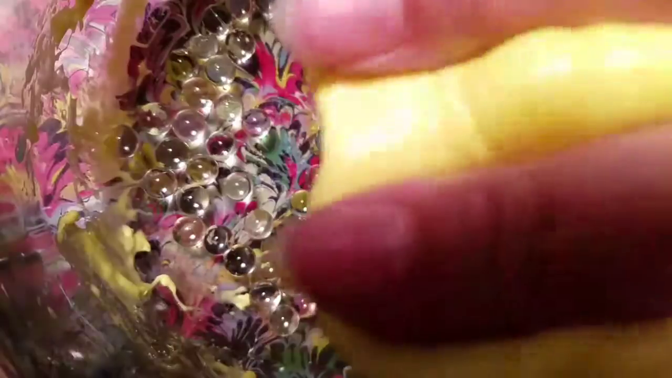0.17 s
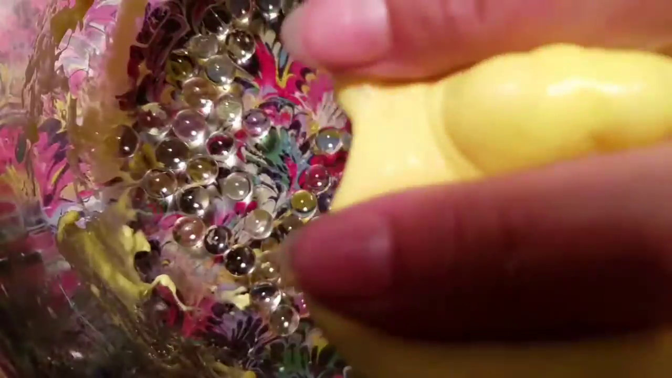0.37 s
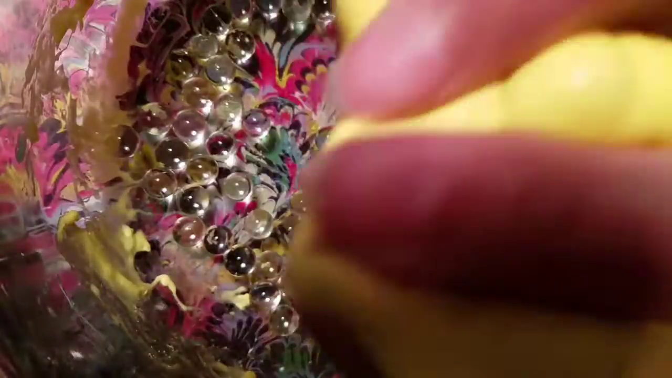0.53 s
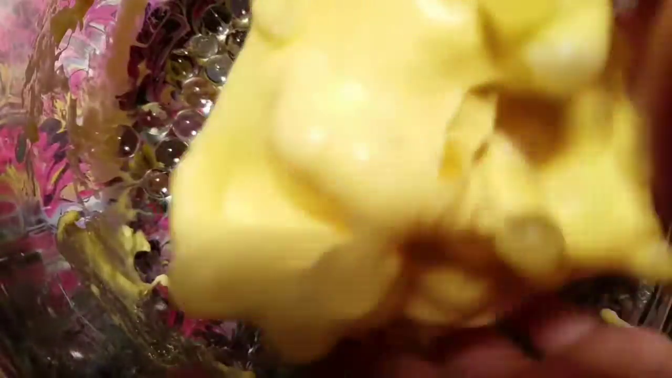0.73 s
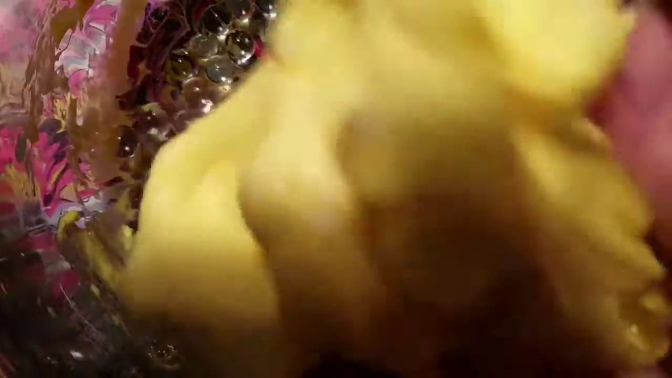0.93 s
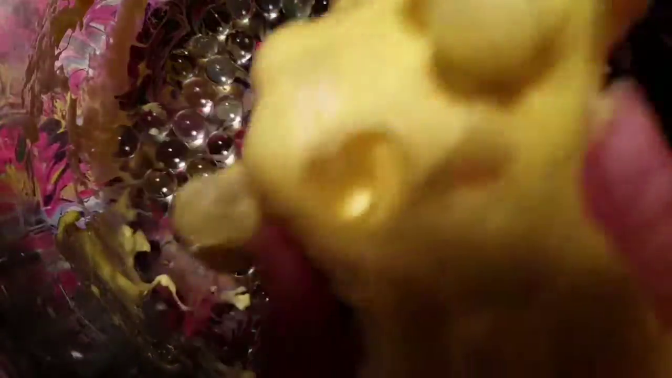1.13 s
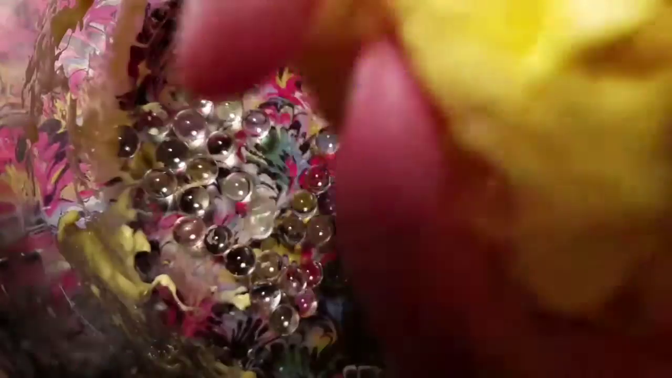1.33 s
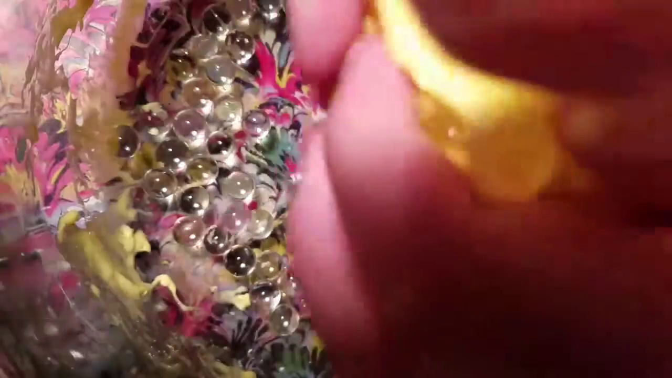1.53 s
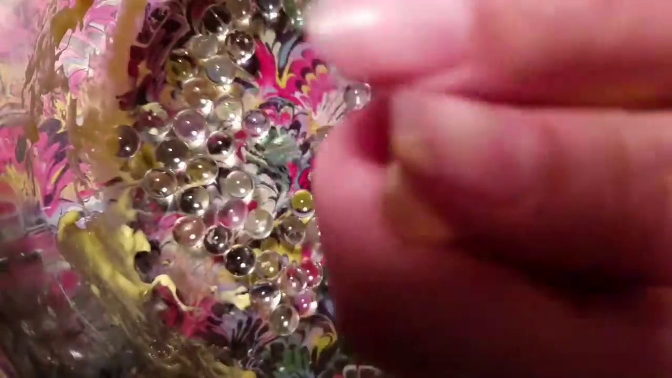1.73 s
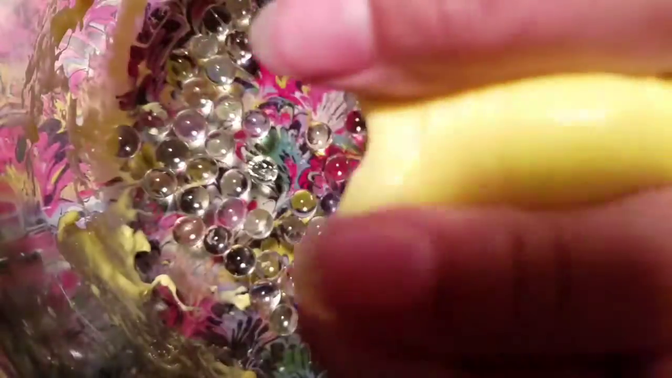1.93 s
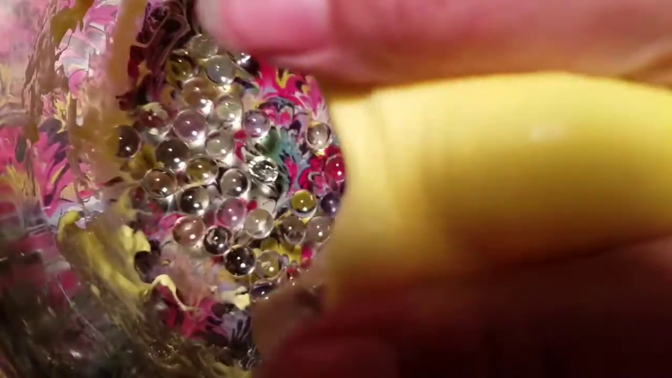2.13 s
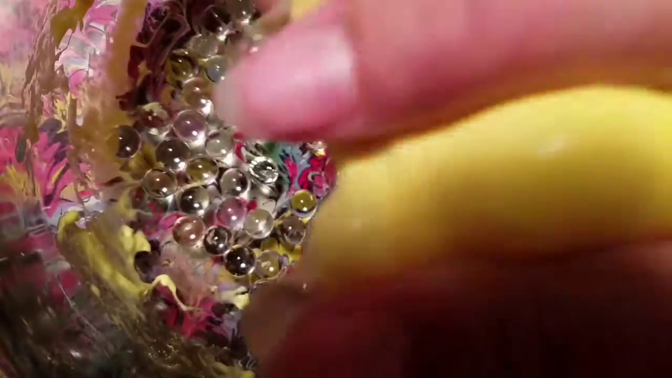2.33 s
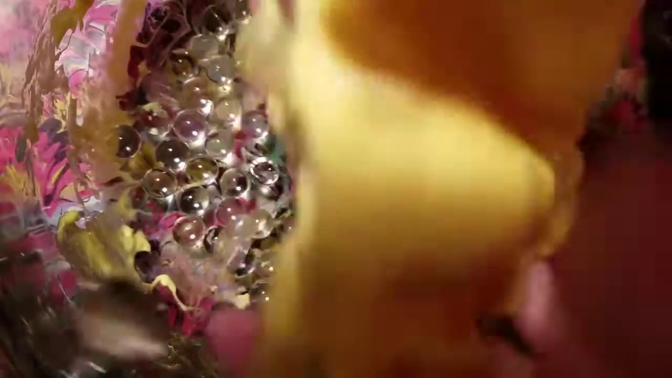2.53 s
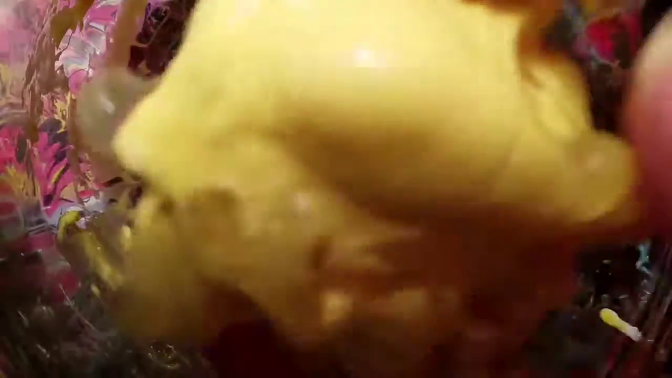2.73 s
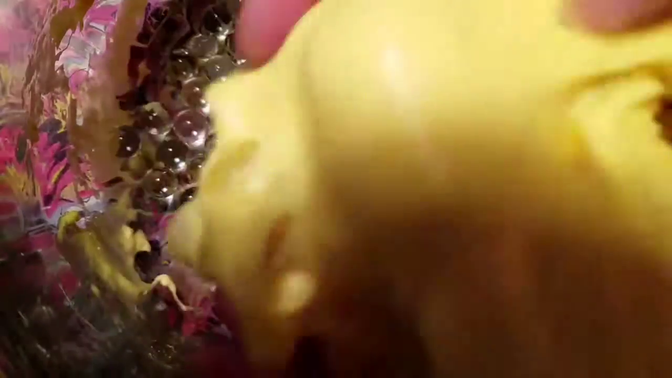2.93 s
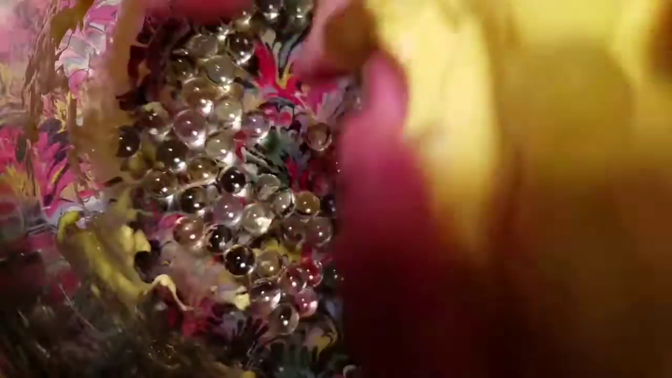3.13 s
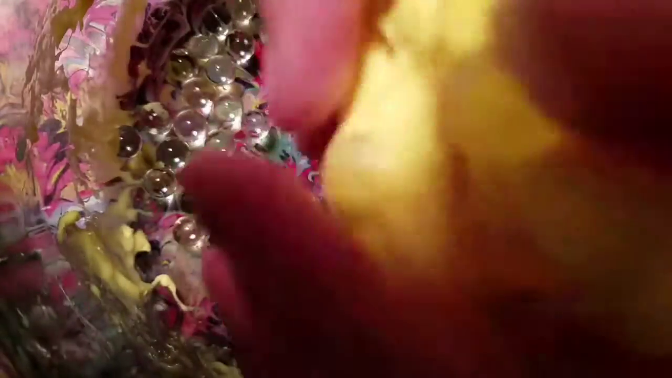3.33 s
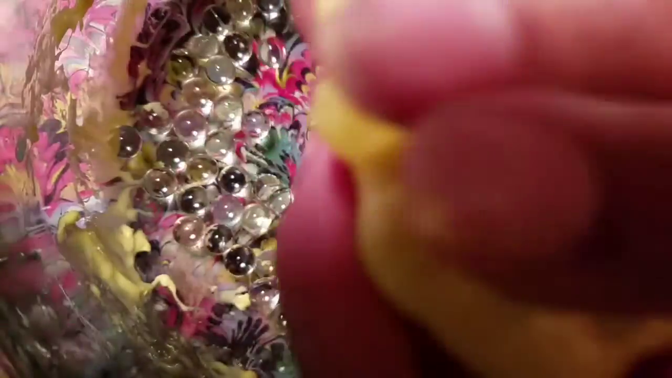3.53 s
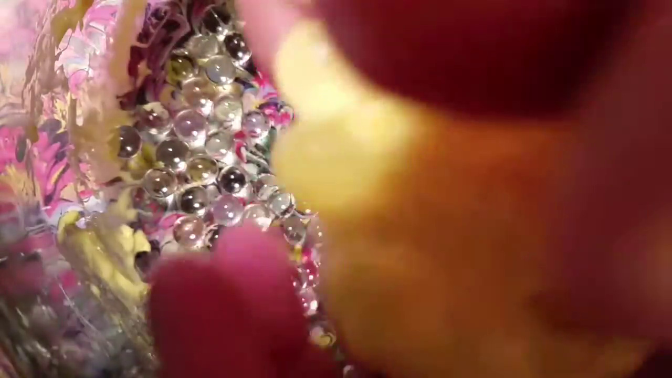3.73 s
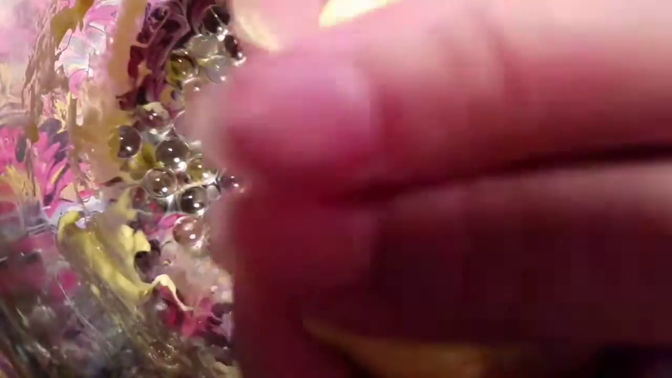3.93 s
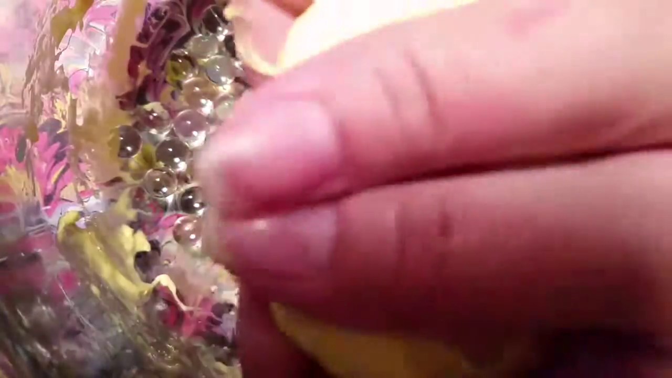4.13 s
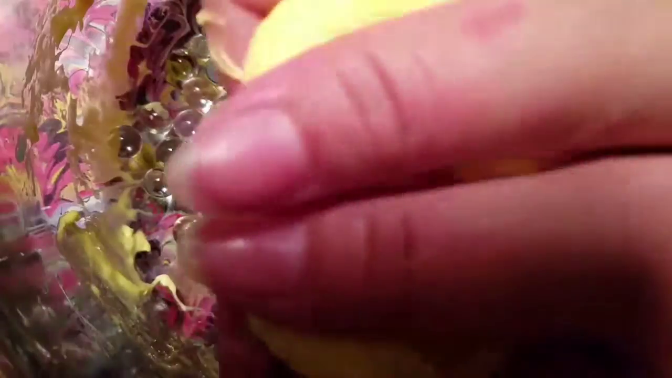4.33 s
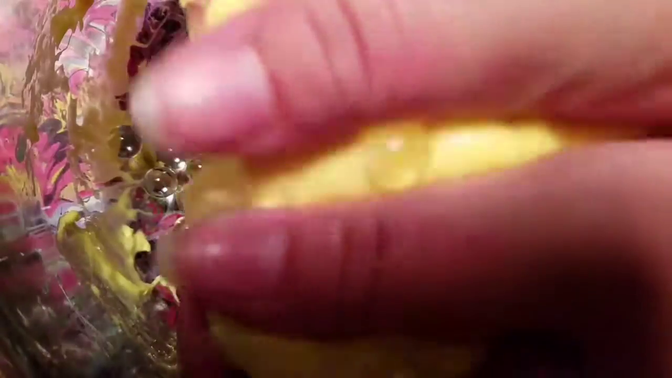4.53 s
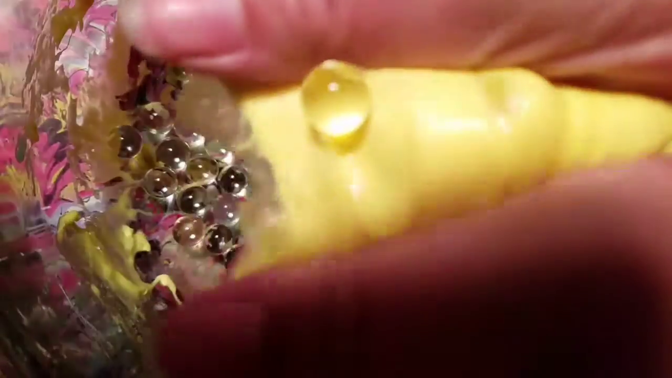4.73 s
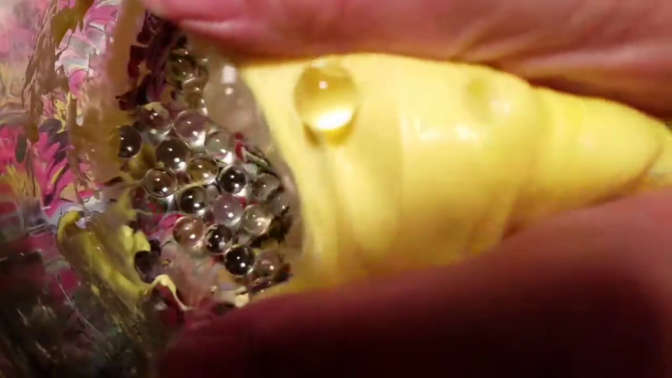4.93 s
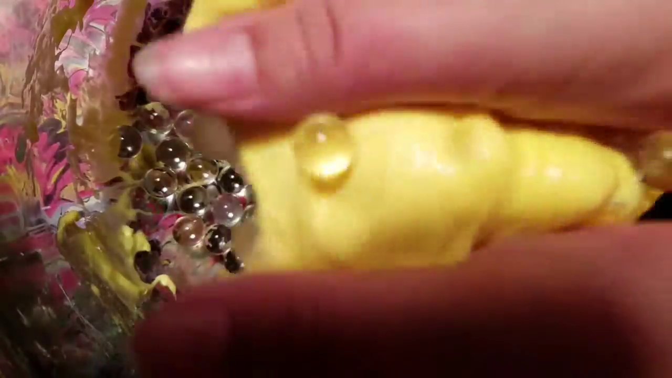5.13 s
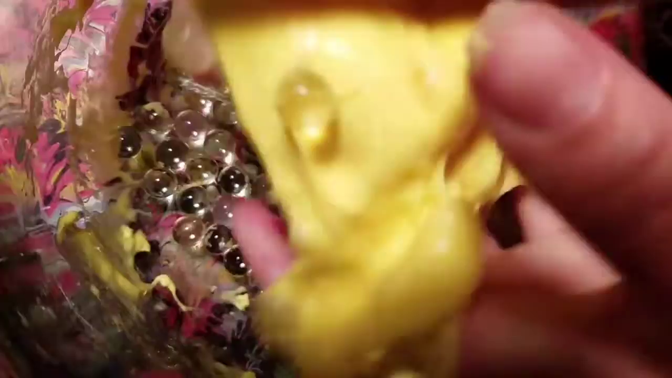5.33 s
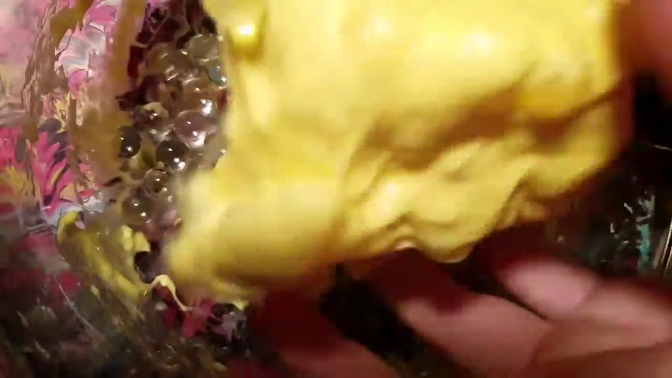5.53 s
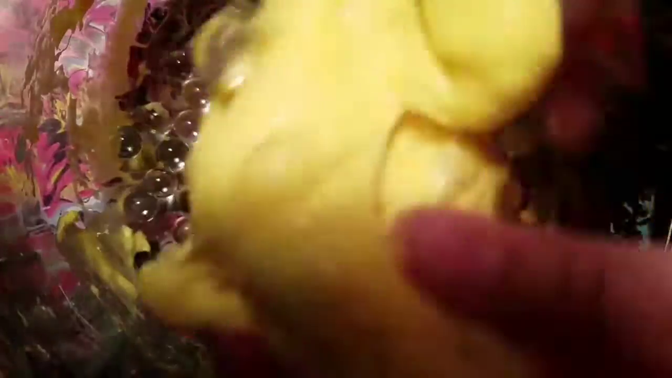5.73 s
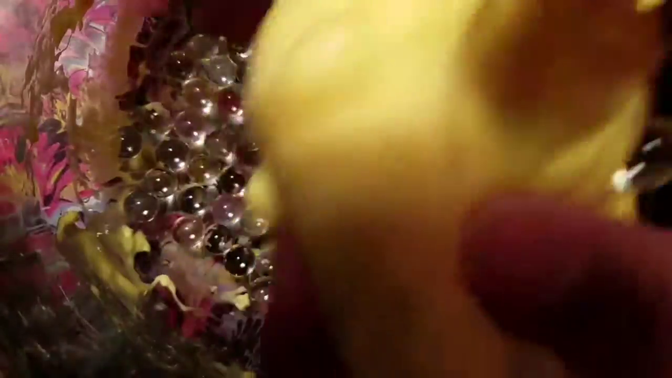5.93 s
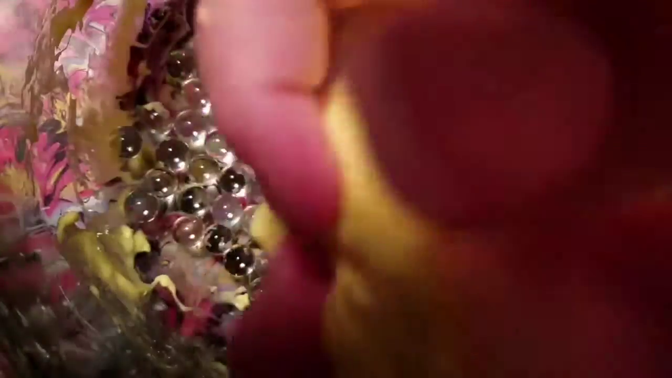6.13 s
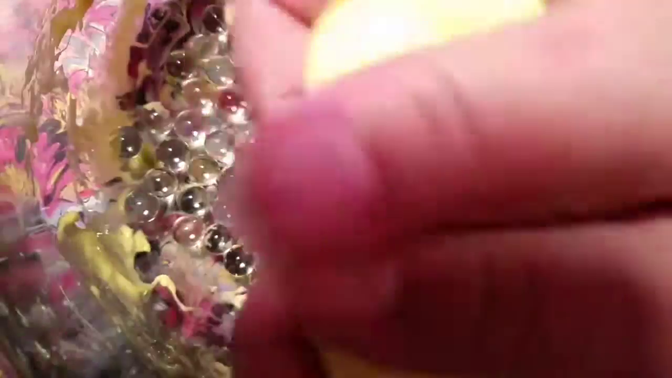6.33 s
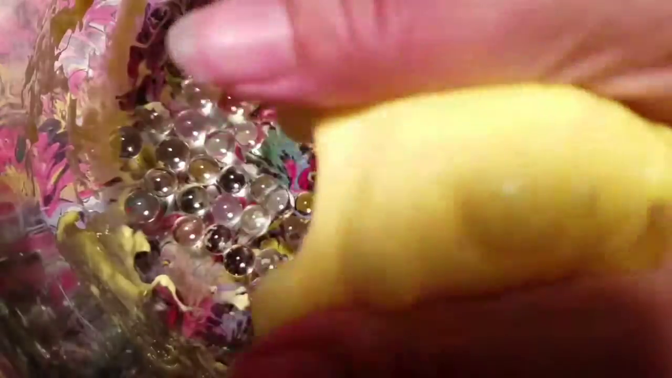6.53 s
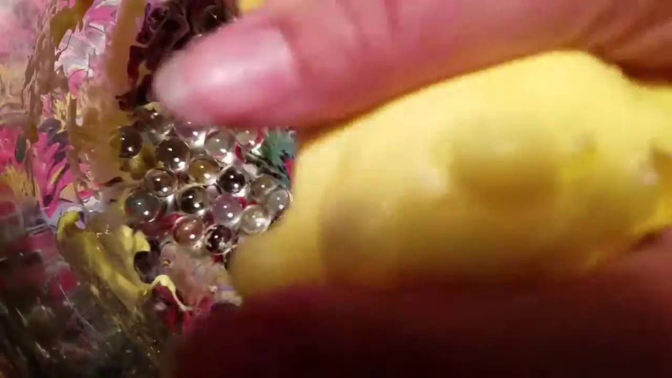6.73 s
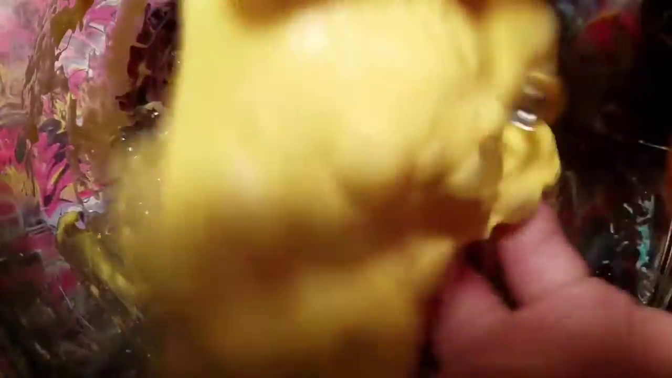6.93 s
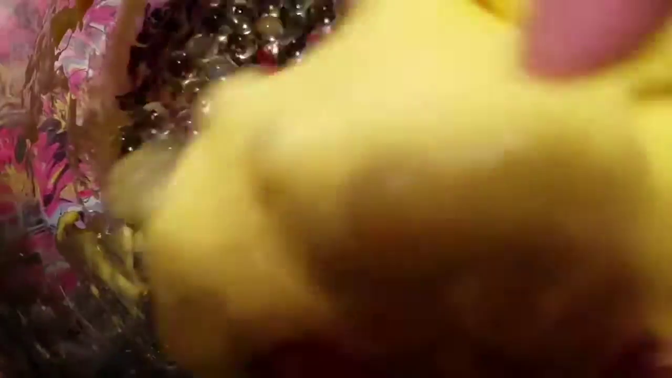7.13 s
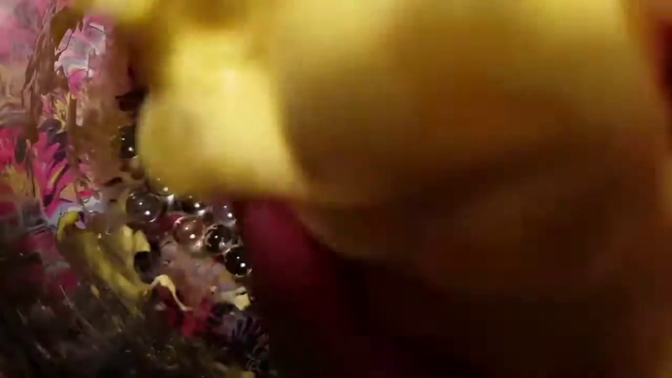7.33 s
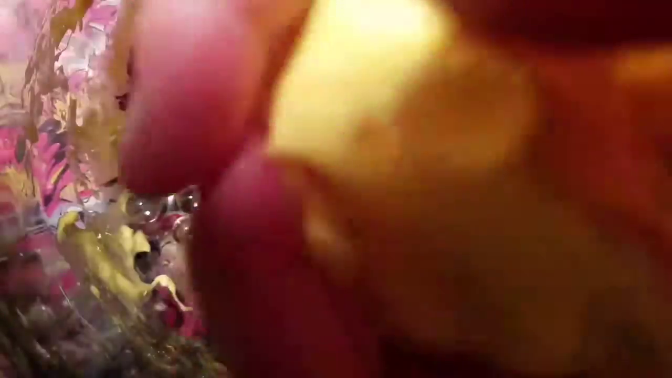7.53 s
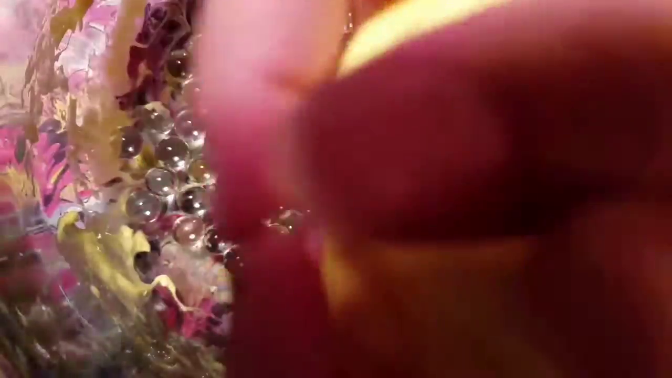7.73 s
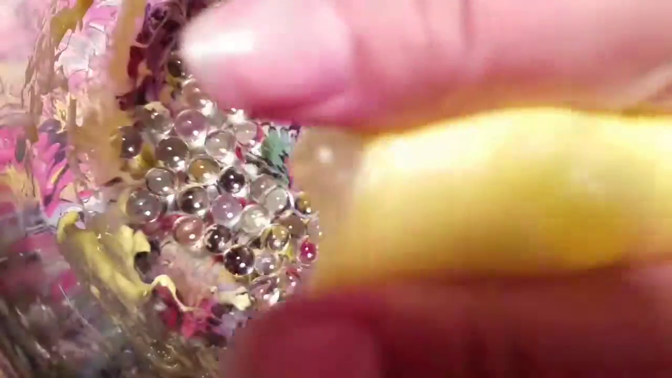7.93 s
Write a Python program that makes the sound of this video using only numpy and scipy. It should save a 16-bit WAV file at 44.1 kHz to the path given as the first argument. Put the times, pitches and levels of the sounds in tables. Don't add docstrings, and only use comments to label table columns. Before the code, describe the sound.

Very close stereo pickup of hands kneading sticky, beaded slime in a glazed bowl. Dense wet pops and crackles burst out at once, thin to sparse peeling and ticks, then return in further squeezes. Dull palm thuds and faint ringing touches on the bowl come later. The small indoor room is quiet, with a low faint hum.

```python
import sys
import numpy as np
from scipy import signal
from scipy.fft import rfft, irfft, next_fast_len
from scipy.io import wavfile
from scipy.ndimage import uniform_filter1d

SR = 44100
rng = np.random.default_rng(int(sys.argv[2]) if len(sys.argv) > 2 else 0)


def field_ratio(decibels):
    return 10 ** (np.asarray(decibels, dtype=float) / 20)


def generate_wav(sig):
    pcm = np.round(np.clip(np.atleast_2d(sig).T, -1, 1) * 32767).astype(np.int16)
    wavfile.write(sys.argv[1], SR, pcm)


N = 356328

# pitch in Hz, width in Hz, level in dB.
HOLLOW = [(667.5, 60.4, 9), (365, 330, -9.5)]
# pitch in Hz, width in Hz, level in dB.
BOWL_AIR = [(1454, 210, 12.5), (1590, 41, -15), (1850, 2500, 1)]
# pitch in Hz, width in Hz, level in dB.
UPPER_AIR = [(2263, 160, 15.5), (2753, 220, 13.5), (3140, 250, 8.5), (3790, 200, 9), (4410, 200, 4)]
# pitch in Hz, width in Hz, level in dB.
CRACK = [(5380, 3900, -2), (7360, 890, 1.5), (7910, 1040, 1), (11040, 810, 2.5), (13250, 1330, 4),
         (14470, 1200, -2)]


def rms_one(x):
    return x / np.sqrt(np.mean(x ** 2) + 1e-20)


def poles(hz, width_hz):
    r = np.exp(-np.pi * width_hz / SR)
    return np.array([1, -2 * r * np.cos(2 * np.pi * hz / SR), r * r])


def resonate(x, modes, extra_db):
    out = 0
    for k, (hz, width_hz, db) in enumerate(modes):
        a = poles(hz, width_hz)
        b = [(1 - a[2]) / 2, 0, (a[2] - 1) / 2]
        out = out + (-1) ** k * signal.lfilter(b, a, field_ratio(db + extra_db[k]) * x)
    return out


def add(track, s, sound):
    i = round(s * SR)
    track[..., i:i + sound.shape[-1]] += sound[..., :N - i]


def two_paths(x, other, lag, alike):
    alike = np.clip(alike, 0, 1)
    right = alike * x + np.sqrt(1 - alike ** 2) * other
    return np.array([x, np.roll(right, lag)])


def room_tone():
    # frequency in Hz, level in dB per Hz.
    tone_points = np.array([(26, -19), (45, -4), (117, -7.5), (200, -10), (377, 1), (646, -15),
                            (786, -11.5), (2730, -21), (9510, -32), (13700, -24.5), (15500, -32)])
    # frequency in Hz, level in dB rms.
    mains_lines = [(120, -74.5)]
    size = next_fast_len(N)
    hz = np.maximum(np.arange(size // 2 + 1) * SR / size, 1)
    common, left, right = rfft(rng.standard_normal((3, size)))
    alike = .9 / (1 + (hz / 800) ** 4)
    both = np.sqrt(alike) * common + np.sqrt(1 - alike) * np.array([left, right])
    colour = field_ratio(np.interp(np.log(hz), np.log(tone_points[:, 0]), tone_points[:, 1]))
    hiss = field_ratio(-60.5) * rms_one(irfft(both * colour, size)[:, :N])
    t = np.arange(N) / SR
    hum = sum(np.sqrt(2) * field_ratio(db) * np.sin(2 * np.pi * line_hz * t) for line_hz, db in mains_lines)
    return hiss + hum


def port_noise():
    band = signal.butter(2, [45, 170], "band", fs=SR, output="sos")
    low = signal.sosfilt(band, rng.standard_normal((2, N)))
    smack_db = uniform_filter1d(peeling()[0], size=8000)
    port_db = np.array([-70.0, -71.5])[:, None]
    return field_ratio(port_db + 0.45 * (smack_db + 62)) * rms_one(low)


def motor_buzz():
    partials_db = [-56, -60]
    start, end, buzz_hz = 2.05, 2.25, 187.4
    out, t = np.zeros((2, N)), np.arange(SR) / SR
    on = np.clip(np.minimum(t, end - start - t) / 0.017, 0, 1)
    buzz = sum(field_ratio(db) * np.sin(2 * np.pi * (k + 1) * buzz_hz * t) for k, db in enumerate(partials_db))
    add(out[0], start, on * buzz)
    return out


def wall_pings():
    # start in seconds, then the level of each wall mode in dB.
    touches = [
        (5.26, -52.5, -90, -90, -90),
        (5.42, -52, -59.5, -67.5, -90),
        (6.988, -56, -46, -58, -66),
    ]
    # time to fall 60 dB in seconds, right port against left in dB.
    wall_modes = [(2.1, -53), (0.75, -7.5), (0.44, 11.5), (0.3, 9)]
    wall_hz = [684, 1588, 2815, 6200]
    out, t = np.zeros((2, N)), np.arange(SR) / SR
    for s, *levels_db in touches:
        for hz, db, (t60_s, right_db) in zip(wall_hz, levels_db, wall_modes):
            beat = 1 + 0.15 * np.cos(2 * np.pi * hz / 167.0 * t)
            ring = field_ratio(db - 60 * t / t60_s) * np.sin(2 * np.pi * hz * t) * beat
            add(out, s, ring * [[1], [field_ratio(right_db)]])
    return out


def thuds():
    # start in seconds, peak in dB, pitch in Hz.
    bumps = [
        (4.137, -34.5, 290),
        (5.236, -37.5, 330),
        (5.455, -45, 346),
        (6.929, -36.5, 330),
        (7.106, -36, 400),
        (7.117, -39, 232),
        (7.138, -44, 300),
        (0.62, -43, 222),
    ]
    t60_s, sag, sag_s = 0.035, 0.41, 0.0097
    out, t = np.zeros(N), np.arange(SR // 4) / SR
    sagging = t * (1 - sag) + sag * sag_s * (1 - np.exp(-t / sag_s))
    rise = np.minimum(t / 0.00095, 1)
    for s, db, hz in bumps:
        add(out, s, field_ratio(db - 60 * t / t60_s) * np.sin(2 * np.pi * hz * sagging) * rise)
    return out


def ticks():
    # start in seconds, peak in dB, pitch in Hz.
    bubbles = [(0.16, -31, 2340), (0.441, -52, 2000), (0.811, -54, 2450), (0.944, -51.5, 2840),
               (1.11, -57, 3670), (1.213, -58, 7440), (1.378, -59, 2490), (1.448, -49.5, 2080),
               (2.2539, -40, 2270), (2.312, -58, 5000), (2.603, -45, 1310), (3.466, -54, 2330),
               (3.6421, -53.5, 1350), (3.762, -52, 2640), (3.7883, -53.5, 2840), (3.836, -54, 2740),
               (3.9609, -49.5, 1310), (4.1368, -22, 6600), (4.136, -25, 1990), (4.1387, -30, 4400),
               (4.3425, -53, 6740), (4.475, -65, 10000), (5.6116, -50, 2400), (6.017, -55, 7950),
               (6.035, -51, 8000), (6.4246, -41, 9300), (6.5074, -39, 10500), (6.633, -50, 9000),
               (7.5014, -45, 8000), (7.86, -55, 4940)]
    out, ms = np.zeros((2, N)), np.arange(2048) / SR * 1000
    for s, db, hz in bubbles:
        burst = rng.standard_normal((2, 2048)) * np.exp(-ms / .6) * (ms < 40)
        bubble = [(hz, .4 * hz, 0)]
        rung = resonate(two_paths(*burst, lag=9, alike=.85), bubble, [0])
        rung = resonate(rung, bubble, [0])
        add(out, s, field_ratio(db + 13.5) * rung / np.abs(rung).max())
    return out


def snaps():
    # start in seconds, level in dB, pitch in Hz.
    threads = [(0.014, -34, 4870), (0.029, -44, 8600), (0.0518, -37, 4500), (0.0614, -34, 3600),
               (0.0656, -32, 3200), (0.0727, -59, 6600), (0.179, -30, 3500), (0.2303, -29, 10300),
               (0.2509, -46, 3400), (0.3208, -35, 7000), (0.349, -35, 5800), (0.3654, -42, 7850),
               (0.3887, -43, 7500), (0.4748, -45.5, 6560), (0.5321, -50, 5500), (0.597, -35, 3830),
               (0.6123, -25, 2680), (0.6936, -43, 4000), (0.7695, -45, 12100), (0.7909, -46, 4400),
               (0.8774, -49, 3300), (0.9167, -48, 5800), (1.015, -33, 10500), (1.082, -52, 4700),
               (1.1872, -55, 11700), (1.3188, -53, 7400), (1.377, -52, 8600), (1.4137, -44, 8700),
               (1.465, -47, 5400), (1.7262, -53, 4400), (1.753, -42, 5600), (1.9492, -32, 3970),
               (1.9544, -43, 3800), (2.0896, -41, 5100), (2.1249, -44, 2700), (2.1323, -45, 3200),
               (2.1401, -51, 3100), (2.1495, -27, 3000), (2.1599, -29, 12200), (2.408, -35, 3200),
               (2.4256, -47, 8000), (2.4313, -32, 3500), (2.442, -46, 7400), (2.5659, -39, 4500),
               (2.5838, -53, 8100), (2.646, -42.5, 9200), (2.8754, -55, 4600), (3.0186, -36.5, 5700),
               (3.1297, -55, 7700), (3.2032, -44.5, 12200), (3.252, -46, 3300), (3.3295, -45, 10500),
               (3.5116, -54, 8800), (3.5587, -46, 9200), (3.6473, -41, 7500), (3.7037, -42, 12100),
               (3.767, -59, 8400), (4.5402, -57, 6000),
               (4.6077, -52, 10700), (4.7205, -35, 3400), (4.803, -37, 2800), (4.8191, -46, 3000),
                    (4.8249, -38, 11700), (4.8378, -10.5, 12700), (4.8556, -25, 11600), (4.8757, -32, 4800),
                    (4.947, -41, 8600), (4.9519, -50, 6700), (4.9649, -41, 7700), (5.014, -49, 3500),
                    (5.024, -33, 3230), (5.161, -43, 8000), (5.1944, -41, 5200), (5.221, -31, 3200),
                    (5.458, -45, 10800), (5.4657, -57, 3060), (5.6205, -49, 3500), (5.6825, -45, 5900),
                    (5.695, -45, 3200), (5.7332, -39, 4800), (5.9226, -53, 7200), (6.0263, -50, 13600),
                    (6.0914, -40.5, 5200), (6.3266, -39, 7400), (6.332, -49, 3100), (6.3726, -41, 9400),
                    (6.4089, -40, 3800), (6.4567, -43, 7300), (6.4728, -29, 13300), (6.5407, -24, 13600),
                    (6.5438, -28, 3840), (6.5489, -32, 3500), (6.5631, -39, 7000), (6.57, -34, 3100),
                    (6.575, -37, 3700), (6.6336, -35, 6200), (6.661, -30, 6600), (6.6934, -48, 6300),
                    (6.9348, -34, 5100), (6.991, -33.5, 4400), (7.041, -44, 3400), (7.1387, -40, 7200),
                    (7.2913, -35, 6100), (7.4914, -49, 9100), (7.5523, -41, 5200), (7.5784, -36, 4400),
                    (7.7615, -51, 3100), (7.7754, -38, 9400), (7.8074, -45, 10800), (7.8405, -46, 3700),
                    (7.9167, -41, 2530), (7.9736, -39, 3100), (7.9855, -28, 5800), (8.0209, -34, 7600),
                    (8.0252, -28, 5000), (8.0769, -31, 9100)]
    out, ms = np.zeros((2, N)), np.arange(512) / SR * 1000
    for s, db, hz in threads:
        burst = rng.standard_normal((2, 512)) * np.exp(-ms / 0.22)
        rung = resonate(two_paths(*burst, lag=12, alike=0.74), [(hz, 0.76 * hz, 0)], [0])
        add(out, s, field_ratio(db + 7.5) * rung / np.abs(rung).max())
    return out


def gurgles():
    # start in seconds, peak in dB, pitch in Hz.
    pockets = [(0.077, -18, 1590), (0.094, -16.5, 1500), (0.1077, -11, 1620), (0.1103, -20, 1310),
               (0.115, -6.5, 1546), (0.123, -17, 1610), (0.126, -16, 1550), (0.132, -30, 1480),
               (0.145, -19, 1540), (2.26, -27.5, 1095), (2.387, -33.5, 660), (4.1363, -18.5, 644.7)]
    fall_cycles, rise_cycles = 29, 1.54
    out, t = np.zeros(N), np.arange(SR // 8) / SR
    for s, db, hz in pockets:
        cycles = hz * t
        lift = 0.069 * (640 / hz) ** 2
        turns = cycles - lift * 2 * (1 - np.exp(-cycles / 2))
        swell = np.minimum(cycles / rise_cycles, 1)
        add(out, s, field_ratio(db - 60 * cycles / fall_cycles) * np.sin(2 * np.pi * turns) * swell)
    return two_paths(out, out, lag=5, alike=1)


def peeling():
    # crest in seconds, level in dB, length in seconds, dryness in dB.
    pressing = [(0.01, -51, 0.54, -17), (0.121, -37, 0.11, -20), (0.254, -54.5, 0.27, -12),
                (1.825, -54, 0.097, -8), (1.937, -51.5, 0.14, -17), (2.086, -53, 0.1, -16.5),
                (2.148, -44, 0.029, -37), (2.174, -48, 0.023, 8.5), (2.207, -47.5, 0.036, -7.5),
                (4.154, -55.5, 0.038, -2), (4.399, -69, 0.021, 7), (4.683, -54, 0.22, -15),
                (4.776, -47.5, 0.039, -13.5), (4.855, -49, 0.13, -10), (6.453, -54.5, 0.22, -16),
                (6.555, -46, 0.14, -16), (6.654, -37, 0.024, -18.5), (6.721, -51, 0.022, -2.5),
                (7.958, -51.5, 0.19, -17), (8.037, -52, 0.11, -11.5)]
    # crest in seconds, level in dB, length in seconds, dryness in dB.
    turning = [(0.606, -39, 0.12, -14.5), (0.81, -63, 0.37, -12.5), (1.04, -54, 0.077, -13),
               (1.321, -62, 0.085, -6), (1.473, -58.5, 0.068, -13.5), (2.423, -42.5, 0.096, -16),
               (2.509, -48.5, 0.12, -12), (2.815, -54.5, 0.087, -17), (2.985, -59.5, 0.11, -10),
               (3.267, -61.5, 0.12, -10.5), (3.645, -64, 0.1, -11.5), (3.76, -63.5, 0.099, -10.5),
               (5.934, -64, 0.024, -10), (6.232, -68.5, 0.24, -14), (5.218, -44, 0.12, -15),
               (5.299, -44.5, 0.048, -15), (5.43, -61.5, 0.23, -10), (5.728, -56, 0.16, -16.5),
               (5.8, -58, 0.071, -7), (6.047, -62, 0.092, -7.5), (6.111, -56.5, 0.1, -17),
               (6.854, -41.5, 0.15, -13.5), (7.073, -53, 0.11, -14.5), (7.264, -54, 0.13, -14),
               (7.487, -63, 0.23, -9), (7.576, -54, 0.066, -13.5)]
    rise_share, roundness, fade_db = 0.57, 1.405, 21.5
    resting_db = -78
    t = np.arange(0, N + 64, 64) / SR
    smack, fizz = field_ratio(2 * resting_db), field_ratio(2 * (resting_db - 9.5))
    for s, db, length_s, dry_db in pressing + turning:
        away = np.where(t < s, (s - t) / rise_share, t - s) / max(length_s, .01)
        power = field_ratio(2 * np.maximum(db - fade_db * away ** roundness, -200))
        smack = smack + power
        fizz = fizz + power * field_ratio(2 * dry_db)
    return [np.interp(np.arange(N) / SR, t, 10 * np.log10(p)) for p in (smack, fizz)]


def clumping():
    return rms_one(uniform_filter1d(rng.standard_normal(N), size=300))


def peel():
    smack_db, fizz_db = peeling()
    hollow_db = -45.5 + 0.78 * (smack_db + 53.5)
    # modes, level in dB, snaps per second, hiss share, likeness of the ports, lag in samples.
    voices = [(HOLLOW, hollow_db - 12.5, 500., .1, .95, 6), (BOWL_AIR, smack_db - 0.5, 600., .08, .9, 1),
              (UPPER_AIR, smack_db + 0.075, 900., .08, .7, 10), (CRACK, fizz_db + 16.0, 800., .22, .6, 11)]
    out = 0
    tearing = clumping()
    for modes, level_db, per_s, hiss, alike, lag in voices:
        clumps = field_ratio(2.5 * tearing + 3.0 * clumping())
        sizes = field_ratio(2.4 * np.minimum(rng.exponential(1, (2, N)), 3)) * rng.choice([-1, 1], (2, N))
        clicks = sizes * (rng.random(N) < per_s * clumps / SR) + hiss * rng.standard_normal((2, N))
        colour_db = 4.07 * rng.standard_normal((len(modes), N // 128 + 1))
        colour_db = np.repeat(colour_db, 128, axis=1)[:, :N]
        rung = resonate(two_paths(*clicks, lag, alike), modes, colour_db)
        out = out + field_ratio(level_db) * rung / np.std(rung[0])
    return out


def pops():
    # start in seconds, peak in dB,
    # pitch in octaves above the hollow, narrowness in dB per octave.
    first_squeeze = [(0.0146, -37.5, 1.5, 2), (0.0405, -22, 2, 10.5), (0.0779, -22.5, 0.6, 20),
                     (0.0938, -27, 3.5, 4.5), (0.1076, -26, 5, 0.5), (0.1137, -23.5, 2.9, 6),
                     (0.1225, -24, 1.3, 9), (0.1329, -22, 2.5, 8), (0.1681, -22.5, 3, 6.5),
                     (0.1783, -17.5, 2.5, 18), (0.1983, -21, 1.2, 29), (0.2244, -24.5, 2, 7),
                     (0.2344, -24.5, 4.5, 10), (0.2632, -16, 2.5, 14.5), (0.2991, -23.5, 2.5, 12),
                     (0.3283, -27.5, 4, 5.5), (0.3562, -29.5, 2.5, 8.5), (0.5617, -37.5, -10, -1),
                     (0.5959, -30.5, 1, 3.5), (0.6112, -24.5, 1.5, 8.5), (0.6261, -35.5, 1, 3),
                     (0.7611, -39.5, 4.5, 2), (1.0054, -35, 1, 17), (1.4659, -41, 2.5, 6),
                     (1.6365, -38, 1.6, 10.5)]
    second_squeeze = [(1.762, -39, 2.3, 4.7), (1.806, -29, 2.6, 3.5), (1.8158, -25.5, 3.54, 9),
                      (1.8405, -28, 3, 2), (1.855, -32, 3.6, 5.2), (1.883, -31, 3.7, 4.9),
                      (1.8967, -25.5, 2.06, 10.4), (1.941, -23, 2.13, 15), (1.964, -21.5, 2.7, 10.7),
                      (1.997, -21.5, 2.6, 7), (2.0536, -20.5, 2.4, 7.3), (2.069, -28.5, 2.2, 9.7),
                      (2.158, -18.5, 4.3, 10), (2.1683, -14, 4.17, 9.1), (2.181, -11, 4.34, 18),
                      (2.1925, -18, 2.7, 8.2), (2.2577, -25.5, 1.5, 4), (2.2917, -33.5, 1.93, 13.5),
                      (2.4908, -32, 2.3, 4.5), (2.5026, -25.5, 2.15, 13), (2.52, -27, 2.87, 4.4),
                      (2.753, -37, 2.8, 4.7), (2.82, -27, 2.58, 10.7), (3.285, -40.5, 2.4, 8.3)]
    third_squeeze = [(4.1365, -15.5, 2.1, 2.55), (4.393, -27, 4.1, 4.9), (4.5827, -28.5, 1.4, 15.7),
                     (4.6153, -32.5, 5.2, 3.8), (4.6726, -18, 4.54, 4.4), (4.7615, -37, 4.1, 3.9),
                     (4.7783, -32.5, 3.7, 10), (4.795, -29.5, 2.1, 10.6), (4.8173, -27, 2.2, 19),
                     (4.837, -20, 5.3, 5.2), (4.841, -15, 4.56, 5.8), (4.9087, -35, 3.5, 4.8),
                     (4.9157, -30, 3.9, 6.1), (4.9304, -24.5, 1.6, 23), (4.9827, -31.5, 1.7, 11),
                     (5.0227, -22.5, 2.3, 13.8), (5.204, -26.5, 2.4, 15), (5.215, -31, 1.7, 4.9),
                     (5.2583, -27.5, 3.1, 3.6), (5.4643, -35, 2.2, 32), (5.7936, -42.5, 2.9, 4.1),
                     (5.812, -30.5, 2.53, 9.4)]
    fourth_squeeze = [(6.3245, -35.5, 1.97, 8.6), (6.349, -35.5, 0.87, 7.7), (6.4022, -29.5, 4.8, 5.2),
                      (6.409, -24.5, 1.55, 7), (6.4426, -18, 2.17, 11.8), (6.4763, -25, 4.9, 6.6),
                      (6.4939, -23, 4.8, 8.4), (6.531, -30, 3.2, 5.2), (6.5438, -18.5, 2.24, 9),
                      (6.564, -39, 2.8, 8.2), (6.6193, -27, 2.3, 12.5), (6.6485, -32, 2.3, 8.5),
                      (6.6549, -31.5, 1.2, 5.1), (6.663, -26.5, 2.25, 6.5), (6.7119, -21.5, 3, 9.1),
                      (6.7464, -16, 1.56, 17.8), (6.827, -17, 1.92, 7.8), (6.8926, -23.5, 2.44, 10),
                      (7.0796, -28, 1.14, 20), (7.4588, -34, 2.6, 12), (7.774, -41.5, 6.5, 2.1)]
    fifth_squeeze = [(7.8785, -21.5, 2.4, 8.5), (7.8844, -32.5, 2.8, 3.8), (7.9153, -22.5, 1.37, 21),
                     (7.9326, -13.5, 1.78, 21), (7.9457, -15.5, 3.02, 6.8), (7.9594, -23, 2.9, 15),
                     (7.969, -26, 2.2, 20), (7.9813, -22, 2.63, 13), (7.9934, -22.5, 1.22, 28),
                     (8.0115, -17.5, 3.36, 9.6), (8.0254, -19.5, 1.8, 8.9)]
    group_octaves = np.array([0, 1.16, 2.16, 3.8])
    # modes, level in dB, burst in ms, spread in dB, likeness of the ports,
    # share of the path lag, softness of the start, first spike.
    groups = [(HOLLOW, 3.0, .35, 1.5, .97, .8, .8, .01), (BOWL_AIR, 0.3, 1.3, 2.5, .95, .12, 1.2, .1),
              (UPPER_AIR, 0.3, .6, 2.0, .8, .7, .8, .6), (CRACK, 11.0, 1.1, 1.5, .8, 1., .15, 1.5)]
    out, ms = np.zeros((2, N)), np.arange(2048) / SR * 1000
    squeezes = first_squeeze + second_squeeze + third_squeeze + fourth_squeeze + fifth_squeeze
    for s, peak_db, octave, narrow_db in squeezes:
        levels_db = peak_db - narrow_db * np.abs(group_octaves - octave)
        noise, spread, chance = rng.standard_normal((2, 2048)), rng.standard_normal(8), rng.random(2)
        lag = 8 + 12 * chance[0]
        for db, (modes, trim_db, burst_ms, spread_db, alike, share, soft, spike) in zip(levels_db, groups):
            age = ms / (burst_ms * (.6 + .8 * chance[1]))
            shape = age ** soft * np.exp(-age) + spike * np.exp(-ms / 0.027)
            burst = noise * shape * (ms < 40)
            mode_octaves = np.log2(np.array(modes)[:, 0] / HOLLOW[0][0])
            lean_db = -.55 * (narrow_db + 4.0) * np.abs(mode_octaves - octave)
            struck = two_paths(*burst, round(share * lag), alike)
            rung = resonate(struck, modes, spread_db * spread[:len(modes)] + lean_db)
            add(out, s, field_ratio(db + trim_db) * rung / np.abs(rung).max())
    return out


def room(x):
    t60_s, first_echo_s = .3, 0.0063
    t = np.arange(SR // 2) / SR
    tail = rng.standard_normal((2, len(t))) * field_ratio(-60 * t / t60_s) * (t > first_echo_s)
    tail = signal.lfilter([1], [1, -.4], tail)
    tail = tail / np.sqrt(np.sum(tail ** 2, axis=1, keepdims=True))
    return field_ratio(-26) * signal.fftconvolve(x, tail, axes=1)[:, :N]


def right_port(x):
    # resonance in Hz, its width in Hz, notch in Hz, its width in Hz.
    cavity = [(592.3, 183, 949, 750), (1482, 325, 1580, 330), (2510, 646, 2760, 1500),
              (6630, 1770, 7320, 1120)]
    for hz, width_hz, notch_hz, notch_width_hz in cavity:
        a, b = poles(hz, width_hz), poles(notch_hz, notch_width_hz)
        x = signal.lfilter(b * a.sum() / b.sum(), a, x)
    treble = signal.sosfilt(signal.butter(1, 2200, "high", fs=SR, output="sos"), x)
    return field_ratio(-1) * (x + (field_ratio(10.5) - 1) * treble)


def scene():
    near = pops() + ticks() + peel() + thuds() + gurgles() + snaps()
    left, right = near + room(near) + room_tone()
    through_solids = wall_pings() + motor_buzz()
    return np.array([left, right_port(right)]) + through_solids + port_noise()


def roll_off(x):
    return signal.sosfilt(signal.butter(12, 16470, fs=SR, output="sos"), x)


def record(dry):
    steep = signal.ellip(6, 1, 24, 14620, fs=SR, output="sos")
    cut = signal.sosfilt(steep, dry)
    return roll_off(cut)


dry = scene()
out = record(dry)
generate_wav(out)
```